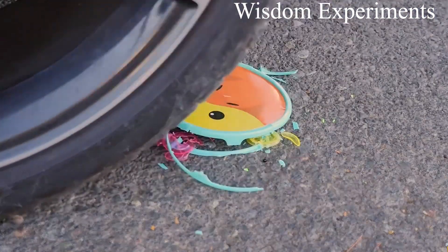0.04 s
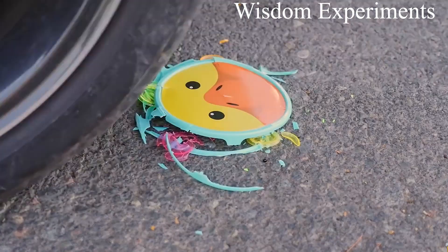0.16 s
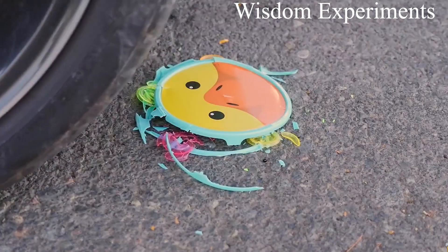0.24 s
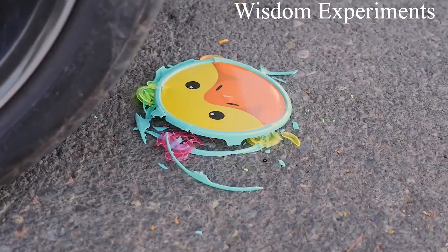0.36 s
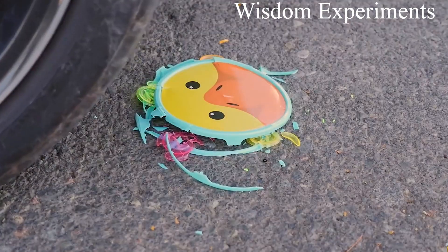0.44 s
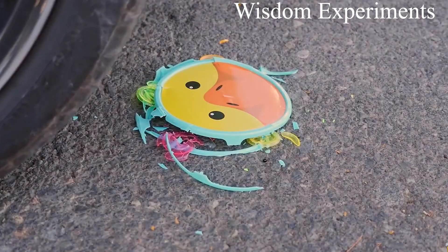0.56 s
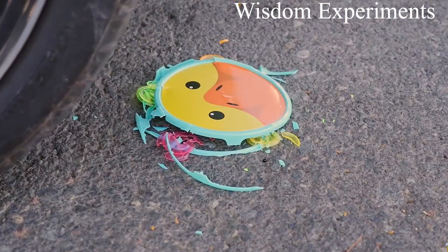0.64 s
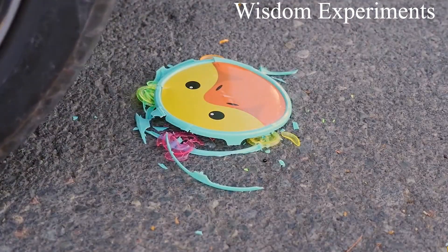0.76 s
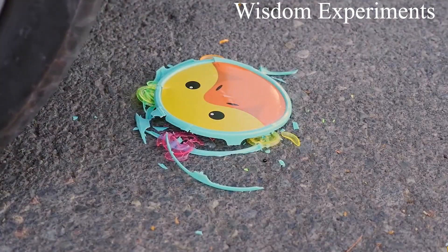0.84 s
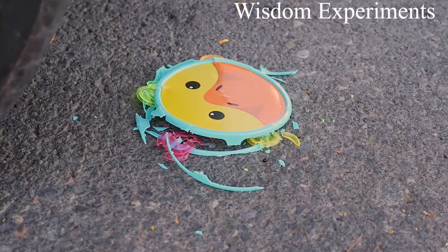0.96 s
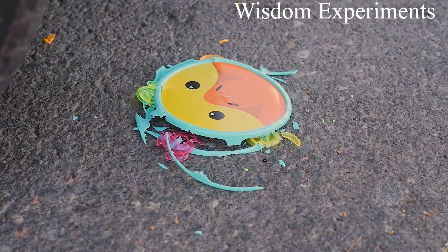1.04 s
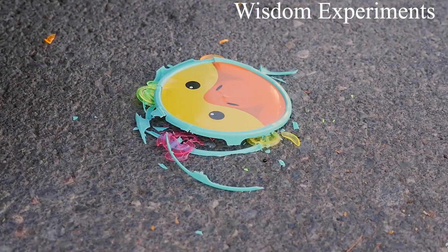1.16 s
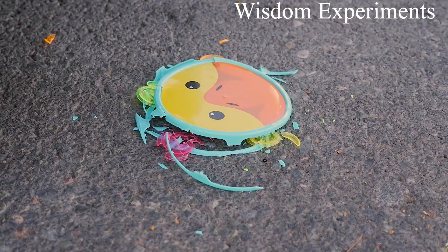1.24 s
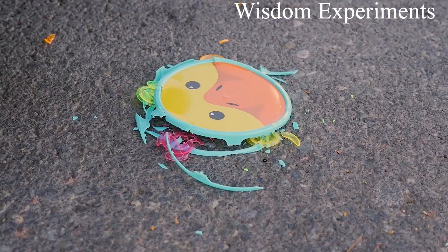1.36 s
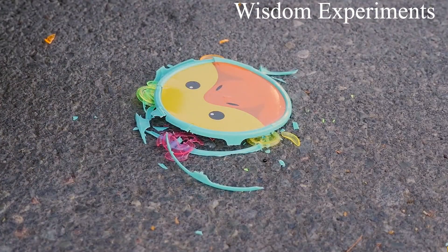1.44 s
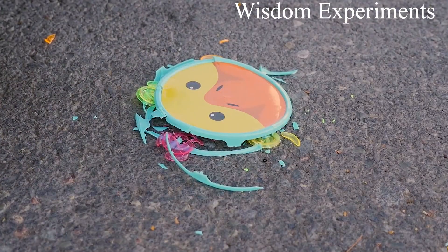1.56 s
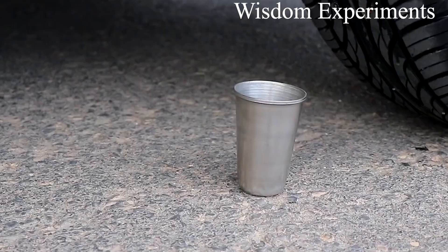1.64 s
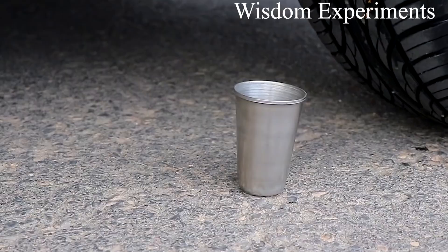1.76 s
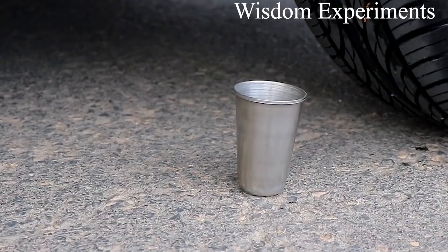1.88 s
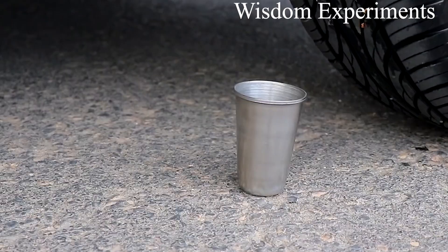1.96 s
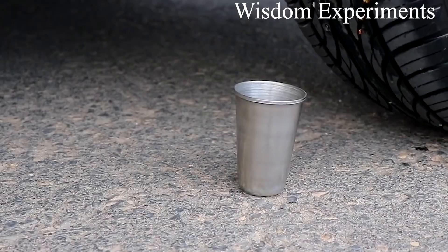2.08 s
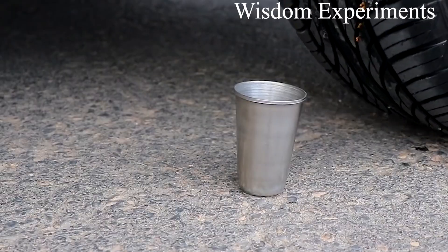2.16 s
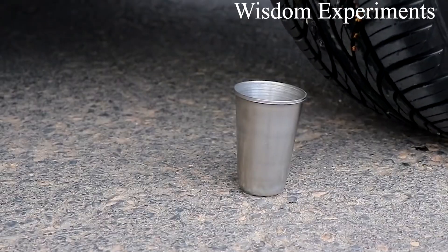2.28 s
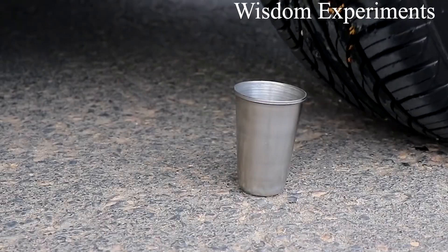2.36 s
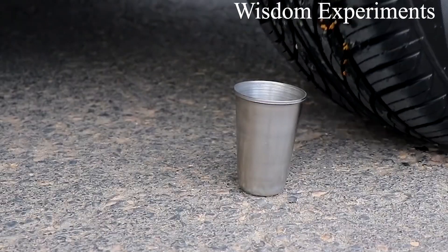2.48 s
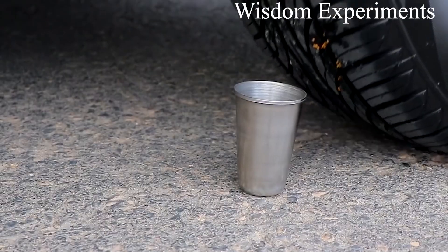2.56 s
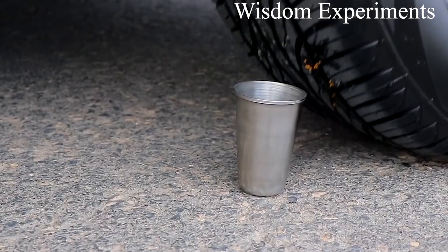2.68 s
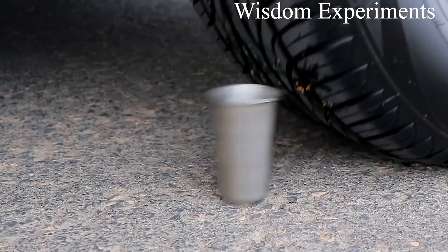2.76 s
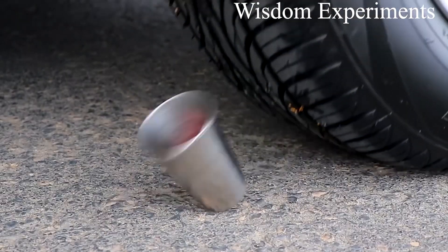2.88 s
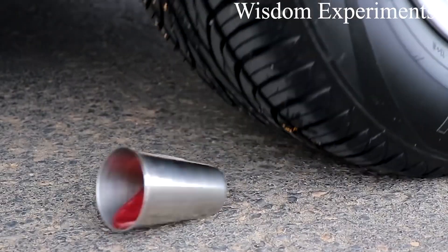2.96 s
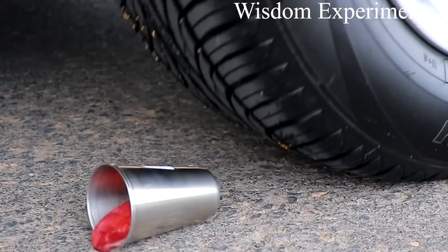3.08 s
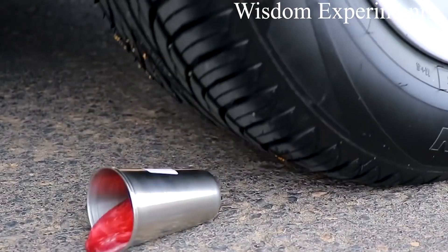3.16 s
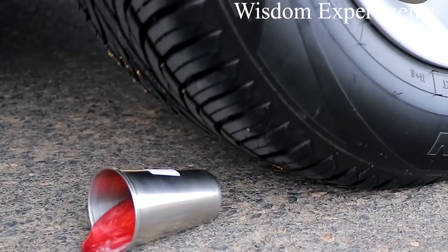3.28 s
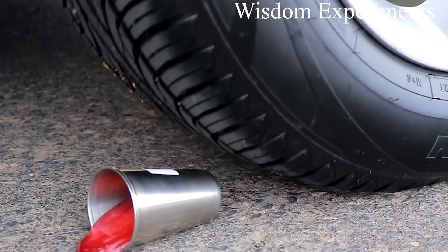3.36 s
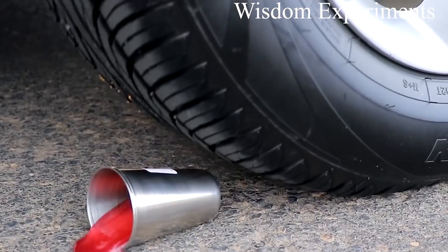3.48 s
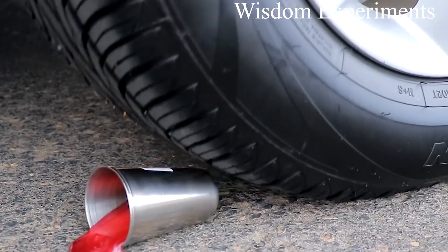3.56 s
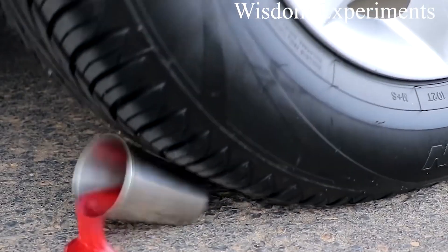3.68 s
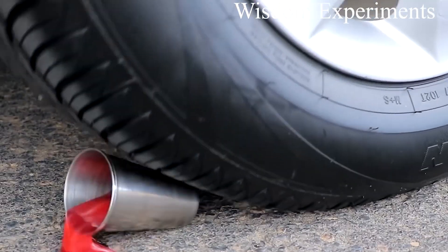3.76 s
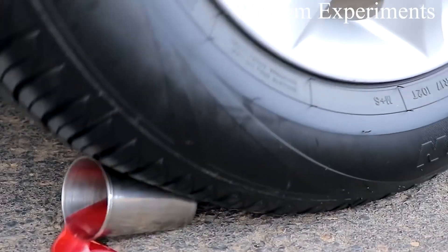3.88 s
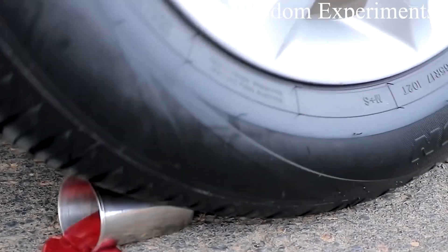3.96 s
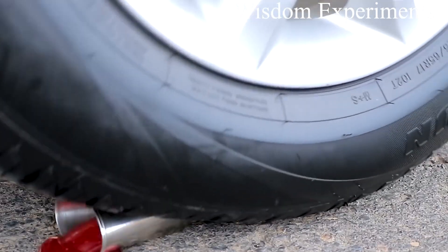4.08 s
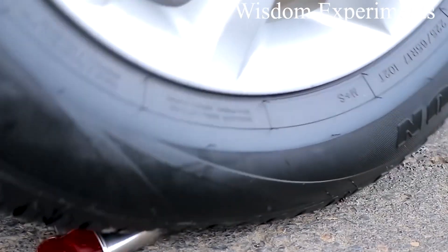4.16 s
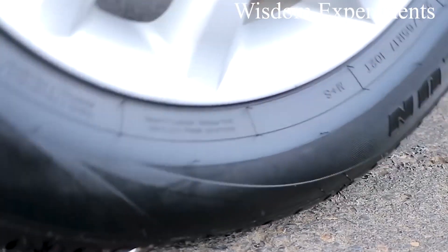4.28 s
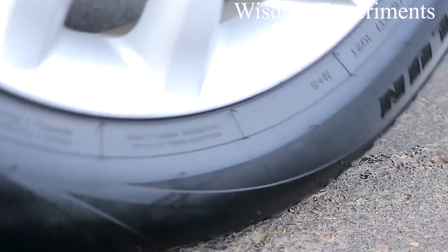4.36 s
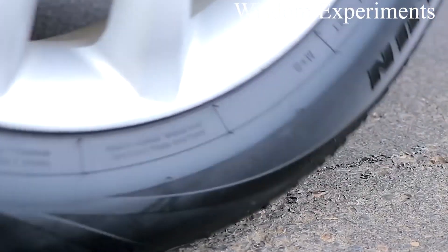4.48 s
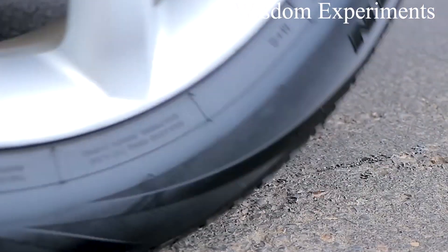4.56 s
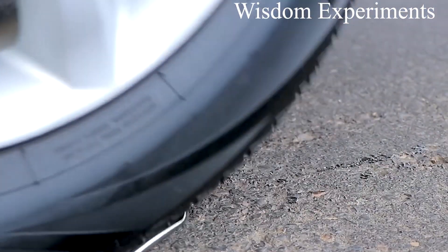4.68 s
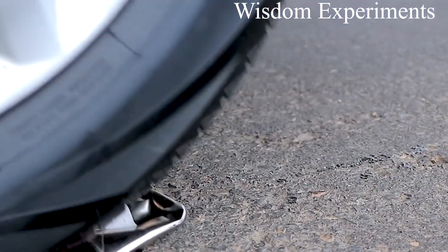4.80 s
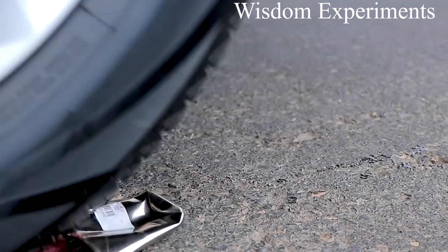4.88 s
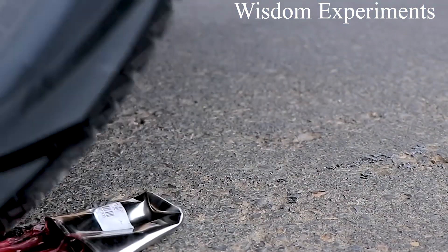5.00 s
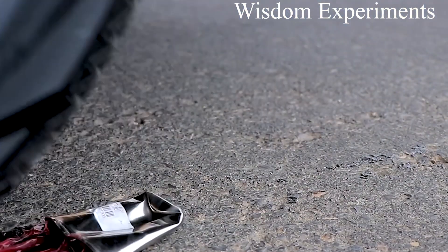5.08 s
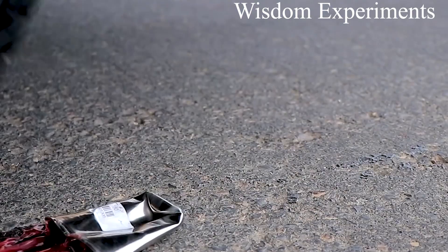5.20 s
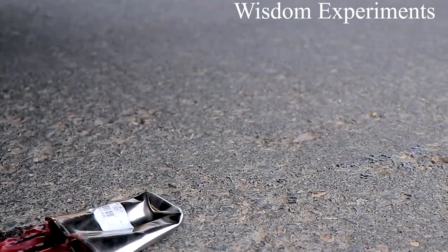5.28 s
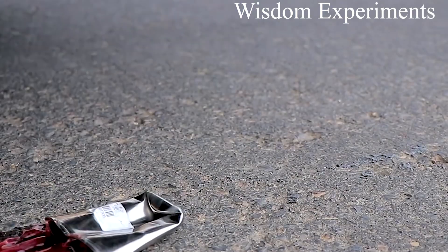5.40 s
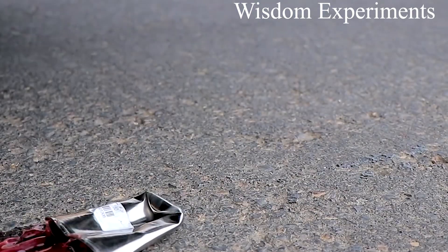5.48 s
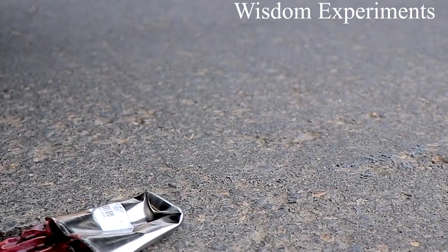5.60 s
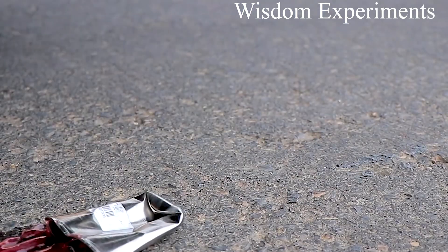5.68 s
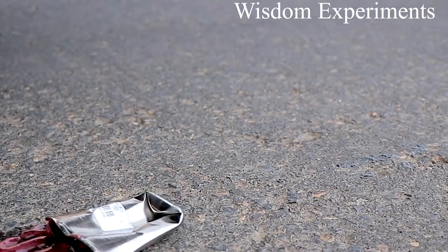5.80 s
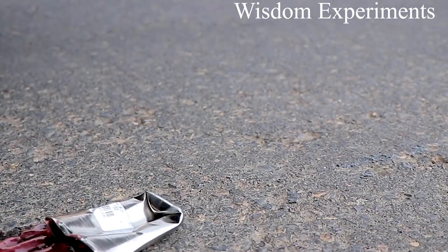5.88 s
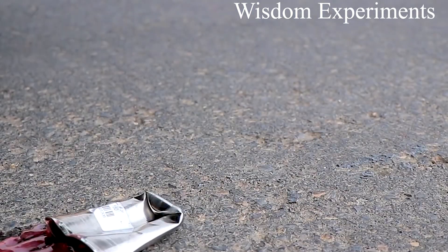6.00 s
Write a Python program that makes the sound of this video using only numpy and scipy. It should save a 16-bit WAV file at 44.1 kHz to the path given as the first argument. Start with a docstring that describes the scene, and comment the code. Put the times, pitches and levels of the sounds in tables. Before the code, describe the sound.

A short, brittle crunch of plastic under a tyre gives way to soft outdoor air. Then a nudged steel cup clacks, topples and bounces on the road, ringing. A creeping car shoves it with a scrape, grit crackles, and the metal folds in sharp pops before slapping down flat. Two muffled knocks come last. Faint tyre rush and light wind lie underneath, and the loudest blows overload the close microphone.

```python
"""A plastic toy crunches and snaps under the tyre of a car creeping over asphalt, close by.
In a second scene a steel cup of liquid rocks, falls with a ringing crack and skids as the tyre shoves it.
Its wall buckles in sharp pops, the flattened cup claps back on the road, and two dull knocks follow.
Light wind thumps on the microphone, and the loudest blows overload it."""
import sys
import numpy as np
from scipy import signal
from scipy.fft import rfft, irfft, next_fast_len
from scipy.io import wavfile
from scipy.ndimage import uniform_filter1d, map_coordinates

SR = 44100
rng = np.random.default_rng(int(sys.argv[2]) if len(sys.argv) > 2 else 0)


def unload_wav(signal):
    """Save mono or channel-first audio to the path in sys.argv[1] as 16-bit WAV at rate SR, clipped to [-1, 1]."""
    wavfile.write(
        sys.argv[1],
        SR,
        np.round(np.clip(np.atleast_2d(signal).T, -1, 1) * 32767).astype(np.int16),
    )


N = 266364

# tone colour of plastic and grit snapping: f/Hz, level/dB
BRITTLE = [(100, -28.5), (1000, -10), (3000, -1), (5500, 6), (9000, -7.5), (15000, -10)]
# tone colour of steel hitting the road: f/Hz, level/dB
CONTACT = [(50, -26), (250, -24.5), (700, 0), (2300, 4), (4000, 1.5), (8000, -0.5), (10500, -10),
           (15000, -9)]
# tone colour of a sharp crack: f/Hz, level/dB
CRACK = [(50, -28), (200, -11.5), (550, 1), (1200, 2), (2400, 3), (3600, -5), (5500, -9), (9000, -26),
         (15000, -40)]


def amp(db):
    """Turn decibels into a gain to multiply by."""
    return 10 ** (np.asarray(db) / 20)


def unit(x):
    """Scale a sound to an average strength (rms) of 1."""
    return x / np.sqrt(np.mean(x ** 2) + 1e-20)


def even(x, seconds):
    """Hold a noise near strength 1 over stretches of the given length."""
    size = max(2, int(seconds * SR))
    power = uniform_filter1d(uniform_filter1d(x * x, size), size)
    return x / np.sqrt(np.abs(power) + 1e-12)


def along(points, hz):
    """Read between (f/Hz, value) points, with frequency on a log scale."""
    f, values = np.transpose(points)
    return np.interp(np.log(hz + 1), np.log(f + 1), values)


def curves(rows):
    """Join timed rows with straight lines: one curve for each column after the time."""
    times, *columns = np.transpose(rows)
    return [np.interp(np.arange(N) / SR, times, column) for column in columns]


def wobble(rate):
    """A smooth random curve through `rate` points a second."""
    points = rng.standard_normal(int(N * rate / SR) + 4)
    return map_coordinates(points, [np.arange(N) * rate / SR])


def held(start, end, attack_s, release_s):
    """A gain that rises 60 dB over the attack, stays at 1 from start to end, then dies away."""
    t = np.arange(N) / SR
    return amp(-60 * (np.maximum(start - t, 0) / attack_s + np.maximum(t - end, 0) / release_s))


def strokes(rows, attack_s, release_s):
    """A loudness curve that follows the strongest of the (start/s, end/s, level/dB) rows."""
    return np.max([amp(db) * held(start, end, attack_s, release_s) for start, end, db in rows], axis=0)


def filtered(x, response):
    """Multiply each frequency of a sound by response(hz)."""
    size = next_fast_len(len(x) + SR // 4)
    hz = np.fft.rfftfreq(size, 1 / SR)
    return irfft(rfft(x, size) * response(hz), size)[:len(x)]


def coloured(x, spectrum, tilt_db=0, size=1024):
    """Give a sound a tone colour; tilt_db adds that much per octave in the treble."""
    hz = np.fft.rfftfreq(size, 1 / SR)
    gain = unit(amp(along(spectrum, hz) + tilt_db * np.log2(1 + hz / 500)))
    # fold the filter so that nothing sounds before the hit that causes it
    cepstrum = irfft(np.log(gain + 1e-6))
    cepstrum[1:size // 2] *= 2
    cepstrum[size // 2 + 1:] = 0
    click_response = irfft(np.exp(rfft(cepstrum)))
    return signal.fftconvolve(x, click_response)[:len(x)]


def lowpass(x, hz):
    """Gently dull everything above hz."""
    return signal.sosfilt(signal.butter(2, min(hz, SR / 2 - 1), fs=SR, output='sos'), x)


def two_bands(x, low_db, high_db):
    """Give the body and the hiss of a steady sound their own levels."""
    low = filtered(x, lambda hz: 1 / (1 + (hz / 3300) ** 6))
    return amp(low_db) * unit(low) + amp(high_db) * unit(x - low)


def resonances(x, peaks):
    """Let x shake an object that favours certain pitches, given as (f/Hz, width/Hz, level/dB)."""
    def response(f):
        return sum((-1) ** k * amp(db) * 1j * f * width / (hz * hz - f * f + 1j * f * width)
                   for k, (hz, width, db) in enumerate(peaks))
    return unit(filtered(x, response))


def noise(spectrum):
    """Steady noise of strength 1 with the given tone colour."""
    return unit(filtered(rng.standard_normal(N), lambda hz: amp(along(spectrum, hz))))


def grains(rate, spread_db):
    """Random clicks of uneven size, about `rate` a second."""
    clicks = (rng.random(N) < rate / SR) * rng.choice([-1, 1], N)
    return unit(clicks * amp(spread_db * rng.random(N)))


def burst(fade_s, spectrum, tilt_db=0):
    """A puff of noise. Here and below, a fade is the time taken to drop by 60 dB."""
    fade = amp(-60 * np.arange(SR // 3) / SR / fade_s)
    puff = coloured(fade * rng.standard_normal(len(fade)), spectrum, tilt_db)
    return puff * np.linalg.norm(fade) / np.linalg.norm(puff) / 2


def ring(modes, pitch, scatter_db):
    """Struck steel rings in fading tones, mixed anew at each blow; `pitch` multiplies their frequency."""
    t = np.arange(SR // 3) / SR
    hz, db, fade_s = np.transpose(modes)[:, :, None]
    strength = amp(db + scatter_db * rng.standard_normal(hz.shape))
    turns = hz * np.cumsum(pitch[:len(t)]) / SR + rng.random(hz.shape)
    tones = strength * amp(-60 * t / fade_s) * np.sin(2 * np.pi * turns)
    onset = 1 - np.exp(-t / 0.00051)
    return np.sum(tones, axis=0) * onset / 2


def add(track, s, sound):
    """Mix a sound into the track, starting at s seconds."""
    part = track[max(0, round(s * SR)):][:len(sound)]
    part += sound[:len(part)]


def crumbling_toy():
    """The toy gives way under the tyre in a dense stream of tiny fractures."""
    # each crush: start/s, end/s, level/dB
    crushes = [(0, .01, -28), (.01, .056, -34), (.06, .135, -44.5)]
    # tone colour of breaking plastic: f/Hz, level/dB
    shards = [(60, -15), (350, 2), (800, -1.5), (1500, -1), (3000, -2), (6000, -4), (10000, -2.5),
              (15000, -10.5)]
    fractures = even(coloured(grains(rate=14000, spread_db=11), shards), 0.016)
    return strokes(crushes, attack_s=.015, release_s=.115) * amp(2.8 * wobble(257)) * fractures


def brittle_snaps():
    """Single bits of plastic, and later of grit, break with a bright click."""
    # each snap: t/s, level/dB
    snaps = [(.001, -34), (.0085, -30), (0.033, -20), (0.0418, -12.5), (0.075, -37), (.091, -30),
             (0.098, -37), (0.1265, -24), (.149, -41), (3.878, -39), (3.964, -31), (3.977, -34),
             (4.02, -33), (4.025, -19), (4.055, -27), (4.065, -29), (4.082, -29), (4.133, -30),
             (4.2587, -28), (4.443, -25), (4.687, -37)]
    out = np.zeros(N)
    for s, db in snaps:
        add(out, s, amp(db) * burst(0.02, BRITTLE))
    return out


def quiet_air():
    """A soft, almost steady rush behind the first scene."""
    # tone colour of the air: f/Hz, level/dB
    air = [(20, -42), (60, -12.5), (125, -5.5), (300, -9.5), (560, -7), (900, -13), (1700, -13),
           (3000, -13.5), (3400, -20), (6200, -24.5), (9000, -30), (11800, -28.5), (15500, -39)]
    return amp(-58 + 0.37 * wobble(8.4)) * noise(air)


def far_tones():
    """Faint, rough tones swell and fade in the distance."""
    # each tone: start/s, end/s, f/Hz, level/dB
    tones = [(0.31, 0.76, 555, -60), (.2, 1.7, 1130, -75), (.2, 1.7, 2062, -73)]
    t = np.arange(N) / SR
    out = np.zeros(N)
    for start, end, hz, db in tones:
        progress = np.clip((t - start) / (end - start), 0, 1)
        swell = np.sqrt(np.abs(np.sin(np.pi * progress)))
        wavering = amp(2 * wobble(22)) * np.sin(2 * np.pi * hz * t + 1.7 * wobble(80))
        out += amp(db) * swell * wavering
    return out


def far_chirps():
    """A faint high tone pulses quickly in the distance."""
    start, end, chirps_per_s, hz = 1.15, 1.62, 13, 3820
    t = np.arange(N) / SR
    pulsing = np.sin(np.pi * chirps_per_s * (t - start)) ** 4
    tone = np.sin(2 * np.pi * hz * t + wobble(100))
    return amp(-69) * held(start, end, attack_s=.4, release_s=.3) * pulsing * tone


def open_air():
    """The louder outdoor rush of the second scene."""
    # tone colour of the outdoors: f/Hz, level/dB
    outdoors = [(71, -33), (120, -2), (398, -4.5), (690, -3), (733, -4), (812, -11), (917, -5), (1300, -9),
                (2240, -14.5), (2750, -19.5), (3170, -22), (15500, -50)]
    # its loudness over time: t/s, body/dB, hiss/dB
    levels = [(1.72, -50.5, -61), (2, -51.5, -61), (2.4, -52.5, -67.5), (2.8, -52, -63.5), (3.5, -52, -70),
              (5.3, -56, -74), (6.04, -56, -72.5)]
    body_db, hiss_db = curves(levels)
    return two_bands(noise(outdoors), body_db + 0.66 * wobble(16), hiss_db)


def rolling_tyre():
    """Rubber on gritty asphalt makes countless tiny clicks that blur into a rush."""
    # tone colour of the tread: f/Hz, level/dB
    tread = [(71, -33), (120, -8.5), (276, -5.5), (423, -12), (469, -7), (662, -6), (1220, -7.5),
             (1590, -20.5), (2200, -15), (2640, -19), (5380, -23.5), (10500, -48.5), (15500, -39.5)]
    # the tyre comes near, climbs over the cup and rolls away: t/s, level/dB
    roll = [(1.72, -73), (3.5, -58.5), (4.2, -47.5), (4.58, -52.5), (4.8, -46), (5.1, -55), (5.3, -57.5),
            (5.62, -54), (6.04, -57.5)]
    db, = curves(roll)
    rush = coloured(grains(rate=14000, spread_db=18.5), tread)
    return two_bands(rush, low_db=db + 1.3 * wobble(22), high_db=db - 14)


def wind():
    """Gusts thump on the microphone over a light breeze; each swells to its middle and eases off."""
    # each gust: start/s, length/s, relative level/dB
    gusts = [(1.735, 0.043, -40), (2.391, 0.25, -34), (2.74, 0.18, -36), (3.157, 0.31, -32),
             (3.52, 0.03, -40), (3.58, 0.154, -34.5), (3.761, 0.073, -37), (4.234, 0.18, -38.5),
             (4.655, 0.076, -39), (4.8, 0.078, -40), (5.669, 0.17, -39), (5.909, 0.056, -39.5)]
    # tone colour of the rumble: f/Hz, level/dB
    rumble = [(10, -7.5), (25, 0), (42, -2.5), (65, -15.5), (100, -18), (200, -43.5), (500, -75.5)]
    breeze_db, lift_db, arch_db, flutter_db = -52.5, 2, 8, 1.5
    t = np.arange(N) / SR
    strength = amp(breeze_db + 3 * wobble(5.4))
    for start, length, db in gusts:
        arch = np.sin(np.pi * np.clip((t - start) / length, 0, 1))
        swell = amp(db + lift_db + arch_db * (arch - 1))
        gust = swell * held(start, start + length, attack_s=.14, release_s=.22)
        strength = np.maximum(strength, gust)
    return strength * amp(flutter_db * wobble(18)) * even(noise(rumble), 0.019)


def tumbling_cup():
    """The nudged cup rocks with dull clacks, falls with a ringing crack and chatters to rest."""
    # ringing tones of the round cup: f/Hz, level/dB, fade/s
    wall_tones = [(528, -23.5, 0.58), (1097, -17.5, .25), (1373, -6.5, 0.18), (1557, -13, 0.06),
                  (1880, -18.5, 0.15), (2200, -14.5, .15), (2300, -13, 0.16), (2424, -9, 0.14),
                  (2526, -19.5, 0.031), (2990, -16.5, 0.17), (3080, -11.5, .05), (3530, -7.5, .05),
                  (3970, -13, 0.057), (4570, -17.5, .035), (5200, -9, 0.046), (5610, -11, .04),
                  (6520, -16, 0.046), (7260, -21.5, .035), (8660, -18, 0.042)]
    # ringing tones of its bottom, strongest while it stands: f/Hz, level/dB, fade/s
    base_tones = [(573, -15.5, 0.48), (1377, -3.5, .12)]
    # tone colour of the stiff bottom's clack: f/Hz, level/dB
    clack = [(150, -25), (500, -9), (900, -10.5), (1500, -4.5), (1950, -1.5), (2500, 1.5), (2900, -12),
             (3600, -11.5), (4400, -37), (12000, -46)]
    # liquid running along the wall bends the pitch: t/s, pitch/ratio
    slosh = [(2.9, 1), (3.08, 1.016), (3.3, .96)]
    # the cup rocks on its base: t/s, level/dB, wall ring/dB
    rocks = [(2.856, -18.5, 0), (2.861, -16, -12), (2.899, -25.5, -9), (2.9077, -23.5, 6),
             (2.935, -22, -11), (2.9628, -26, -6), (2.993, -33.5, 1), (3.0145, -39, 10)]
    # it falls on its side and bounces: t/s, level/dB
    falls = [(3.0577, -.5), (3.1298, -8.5), (3.168, -11)]
    chatter = [(3.2112 + k * .0135, -25.5 - k * .9) for k in range(6)]  # quick, ever weaker taps
    bright_hz_per_db = 170  # a softer blow is duller
    # blows: t/s, level/dB, brightness/Hz, wall ring/dB, bottom/dB
    on_base = [(s, db, 3480, ring_db, 12.5) for s, db, ring_db in rocks]
    on_side = [(s, db, 11000 + bright_hz_per_db * db, -2.5, -14) for s, db in falls + chatter]
    pitch, = curves(slosh)
    out = np.zeros(N)
    for s, db, bright_hz, ring_db, base_db in on_base + on_side:
        # the sloshing liquid detunes every blow a little and smears its ring
        sloshing = pitch * (1 + .005 * rng.standard_normal() + .006 * wobble(120))
        wall = ring(wall_tones, sloshing[round(s * SR):], scatter_db=2.5)
        wall += amp(-17.5) * burst(0.082, CONTACT, tilt_db=-.7)
        blow = lowpass(amp(ring_db) * wall + burst(0.016, CONTACT), bright_hz)
        bottom = burst(0.021, clack) + amp(-10.5) * ring(base_tones, np.ones(N), scatter_db=1.5)
        add(out, s, amp(db) * (blow + amp(base_db) * bottom))
    return out


def spinning_rim():
    """The fallen cup spins down on its rim; tiny bumps against the road keep it ringing."""
    # pitches of the rim: f/Hz, width/Hz, level/dB
    rim = [(1274, 53, 2.5), (1950, 25, 4.5), (2230, 70, -2.5), (3240, 42, 5.5), (3960, 63, -0.5),
           (5220, 290, -9), (6650, 200, -23.5), (7520, 190, -30.5)]
    start, end, fade_db_per_s = 3.17, 3.3, 90
    elapsed = np.maximum(np.arange(N) / SR - start, 0)
    spin = amp(-32 - fade_db_per_s * elapsed) * held(start, end, attack_s=.06, release_s=0.082)
    return spin * even(resonances(grains(rate=540, spread_db=21), rim), .05)


def car_hum():
    """A low drone, probably the engine, heard while the car is closest."""
    hz, width_hz = 100, 28
    drone = even(resonances(rng.standard_normal(N), [(hz, width_hz, 0)]), .05)
    return amp(-60) * held(3.7, 5.55, attack_s=4, release_s=3) * lowpass(drone, 160)


def skidding_cup():
    """The rim sticks and slips in uneven jerks that shake the cup; a harder push sounds brighter."""
    # the tyre shoves and drags the cup: start/s, end/s, level/dB
    shoves = [(3.765, 3.768, -28.5), (3.783, 3.793, -23.5), (3.8, 3.815, -15.5), (3.825, 3.85, -37),
              (3.9, 4.08, -44.5), (4.7, 4.89, -41)]
    # pitches of the cup pinched against the road: f/Hz, width/Hz, level/dB
    pinched = [(540, 174, -13.5), (824, 40, -3), (1096, 94, 0), (1230, 108, 1), (1443, 147, -4.5),
               (3535, 58, 0.5), (4220, 81, -8.5), (4660, 75, -10), (5130, 360, -18)]
    push = strokes(shoves, attack_s=.035, release_s=.07)
    treble = amp(-2) * (push / push.max()) ** 0.62
    slips_per_s = 190 * np.exp(.35 * wobble(150))
    slips = np.diff(np.floor(np.cumsum(slips_per_s) / SR), prepend=0)  # one click at each slip
    friction = unit(slips * amp(3.9 * wobble(120))) + amp(-8) * rng.standard_normal(N)
    rasp = even(resonances(friction, pinched), 0.02) + amp(-26) * unit(coloured(friction, CRACK))
    low = filtered(rasp, lambda hz: 1 / (1 + (hz / 2200) ** 4))
    return push * (low + treble * (rasp - low))


def grinding_grit():
    """Grit crackles in clumps as it is ground between steel and road."""
    # each grind: start/s, end/s, level/dB
    grinds = [(3.86, 4.0, -55), (4.02, 4.46, -52), (4.66, 4.75, -56)]
    clumps = grains(rate=260, spread_db=23.5) * amp(4 * wobble(49))
    ticks = signal.fftconvolve(clumps, burst(0.0044, BRITTLE, tilt_db=-3.5))[:N]
    return strokes(grinds, attack_s=.15, release_s=.5) * even(ticks, .2)


def pop(ring_db, hz, crack_db, tilt_db):
    """A crack kicks off a short ring that the rubber smothers; its pitch bends as it settles."""
    fade_cycles = 23  # the ring dies away within this many swings
    t = np.arange(SR // 3) / SR
    # a hard crack starts the ring faster and shakes its pitch more
    hardness = np.clip(amp(crack_db - ring_db), .05, 1)
    bend = 1 + 0.053 * (np.exp(-t / 0.0042) - .5) + .2 * hardness * wobble(709)[:len(t)]
    onset = 1 - np.exp(-t * hardness / 0.00038)
    fade = amp(-60 * (t * hz / fade_cycles) ** 1.32)
    tone = onset * fade * np.sin(2 * np.pi * hz * np.cumsum(bend) / SR)
    return amp(ring_db) * tone + amp(crack_db) * burst(0.017, CRACK, tilt_db)


def buckling_cup():
    """Each fold of the steel wall snaps inward with its own pop."""
    # each fold: t/s, ring/dB, f/Hz, crack/dB, crack tilt/(dB per octave)
    buckles = [(4.0858, -6.5, 1077, -22.5, 1), (4.1828, -8.5, 1690, -1.5, 1), (4.2358, -8, 1070, -13, 2.5),
               (4.2655, -12, 2560, -1.5, 6), (4.3059, -12.5, 1050, -9.5, -6), (4.338, -23, 2380, -18, 4),
               (4.367, -30.5, 1410, -14, -4), (4.372, -35, 2100, -12.5, 1), (4.3901, -11, 935, -12, -7),
               (4.396, -3, 1000, 0, 3.5), (4.411, -19, 900, -13, -8.5), (4.444, -15, 850, -12.5, -6),
               (4.4537, -4, 702, 3.5, 0.5), (4.6515, -34, 1900, -26, -1.5), (4.7234, -36, 1180, -24, -2.5),
               (4.758, -20, 860, -14, -6), (4.7677, -5, 1136, -6.5, -8.5)]
    out = np.zeros(N)
    for s, ring_db, hz, crack_db, tilt_db in buckles:
        add(out, s, pop(ring_db, hz, crack_db, tilt_db))
    return out


def clapping_cup():
    """Freed from the tyre, the flat cup slaps the road and bounces ever faster and weaker."""
    # it creaks free and slaps down: t/s, level/dB, brightness/Hz, ring/dB
    claps = [(4.898, -20.5, 2700, 2.5), (4.915, -12, 3000, 1.5), (4.9193, 5.5, 4620, -8),
             (4.9227, -2, 2770, 7.5)]
    # ringing tones of the flattened cup: f/Hz, level/dB, fade/s
    flat_tones = [(737, -32.5, 0.31), (968, -6, 0.064), (1120, -8, .08), (1216, -3, 0.046),
                  (1387, 2.5, 0.042), (1650, -7, 0.074), (2088, -13, 0.062), (2380, -15, 0.058),
                  (2728, -9, 0.034), (3230, -3, 0.034), (3530, -9, 0.074), (5170, -11.5, 0.052)]
    first_flight_s, shrink, loss_db = .032, .66, 6.5  # each flight is a share of the one before
    landings = [4.964 + first_flight_s * sum(shrink ** j for j in range(k)) for k in range(5)]
    bounces = [(s, -11.5 - k * loss_db, 3080, 0) for k, s in enumerate(landings)]
    out = np.zeros(N)
    for s, db, bright_hz, ring_db in claps + bounces:
        # the folds buzz against each other and blur the ring
        buzz = 1 + 0.0074 * rng.standard_normal() + 0.022 * wobble(400)
        blow = amp(ring_db) * ring(flat_tones, buzz, scatter_db=0.8) + burst(0.029, CONTACT)
        add(out, s, amp(db) * lowpass(blow, bright_hz))
    return out


def dull_knocks():
    """Two muffled knocks, probably stones shifting under the departing tyre."""
    # each knock: t/s, level/dB, f/Hz
    knocks = [(5.735, -36.5, 716), (5.8147, -30.5, 1330)]
    out = np.zeros(N)
    for s, db, hz in knocks:
        add(out, s, pop(db, hz, crack_db=db + 3, tilt_db=-12.5))
    return out


def echo(x, stretch):
    """Road and car body throw back a blur of sound, each frequency dying at its own speed."""
    # the space under the car: f/Hz, fade before stretching/s
    underbody = [(150, .2), (700, 0.34), (2000, 0.25), (5000, 0.12), (12000, 0.063)]
    hz, t, spectra = signal.stft(rng.standard_normal(SR // 2), SR, nperseg=256)
    fade_s = stretch * along(underbody, hz)[:, None]
    _, tail = signal.istft(spectra * amp(-60 * t / fade_s), SR, nperseg=256)
    delayed_tail = np.pad(tail / np.linalg.norm(tail), (SR // 300, 0))
    return signal.fftconvolve(x, delayed_tail)[:N]


def scene():
    """Mix the close sounds and their echoes over a background that switches with the scene."""
    steel = tumbling_cup() + spinning_rim() + skidding_cup() + buckling_cup() + clapping_cup()
    direct = crumbling_toy() + brittle_snaps() + steel + grinding_grit() + dull_knocks()
    wheel_slap = amp(-17) * echo(direct, stretch=0.38)
    under_car_wash = amp(-24) * echo(direct, stretch=1.24)
    microphone_hiss = amp(-81) * rng.standard_normal(N)
    first = quiet_air() + far_tones() + far_chirps()
    second = open_air() + rolling_tyre() + wind() + car_hum() + microphone_hiss
    change_s, blend_s = 1.715, 0.0064
    blend = np.clip((np.arange(N) / SR - change_s) / blend_s, 0, 1)
    background = (1 - blend) * first + blend * second
    return (direct + wheel_slap + under_car_wash + background)[None]


def record(dry):
    """The recorder flattens the biggest peaks and cuts off the highest treble."""
    top_hz = 15950
    clipped = dry[0] / (1 + np.abs(dry[0]) ** 8) ** (1 / 8)
    return .96 * filtered(clipped, lambda hz: 1 / (1 + (hz / top_hz) ** 110))[None]


dry = scene()
out = record(dry)
unload_wav(out)
```